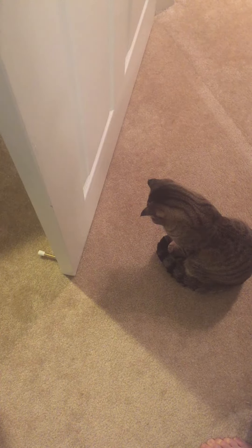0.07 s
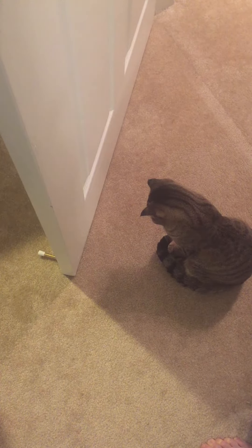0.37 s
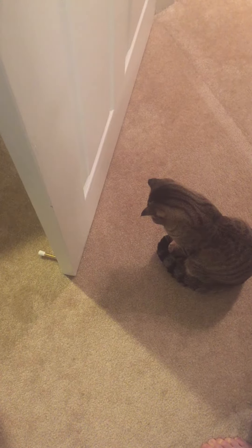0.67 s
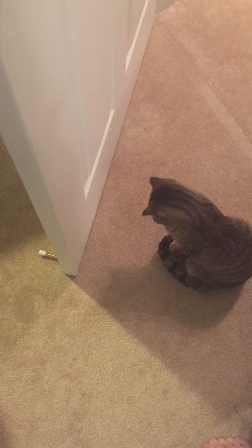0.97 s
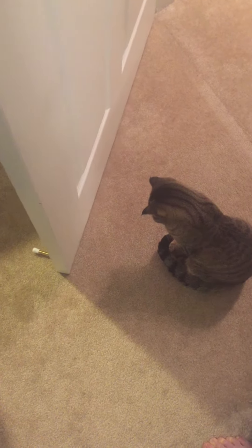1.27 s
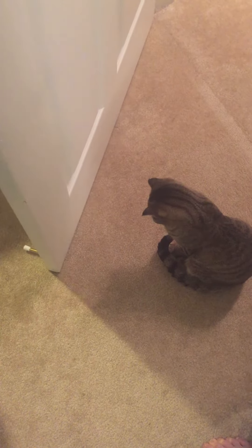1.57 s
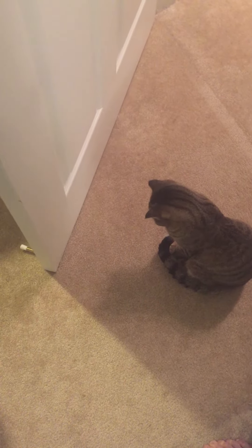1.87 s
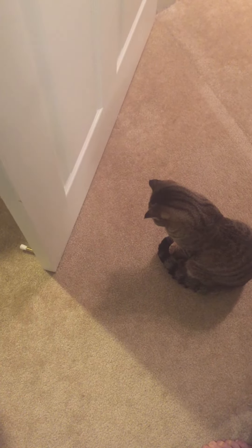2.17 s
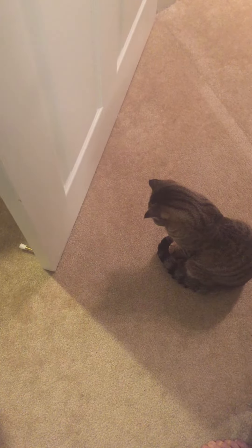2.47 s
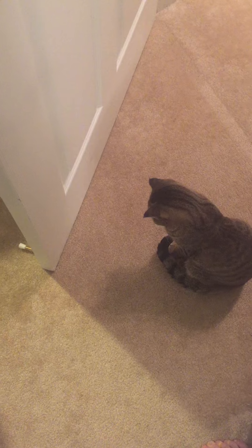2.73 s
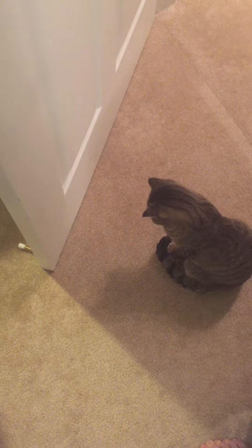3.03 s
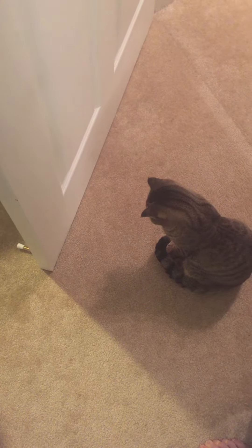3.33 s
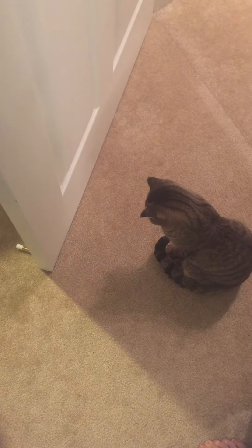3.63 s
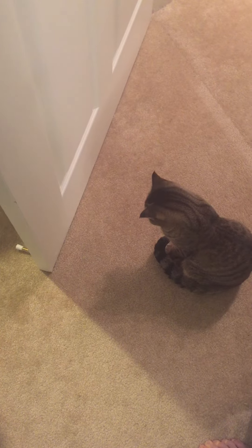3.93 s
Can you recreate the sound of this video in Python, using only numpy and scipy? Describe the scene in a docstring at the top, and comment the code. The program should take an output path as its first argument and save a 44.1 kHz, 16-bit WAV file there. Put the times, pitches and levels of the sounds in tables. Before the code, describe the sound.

A loose wooden door rattles twice and brushes the carpet in a quiet, humming room.

```python
"""A light panelled door, nudged in a small carpeted room, a couple of metres from one microphone.
It bumps twice with a short woody rattle and gives one faint last knock. At each bump the loose door
chatters, ringing its edge, its panels and the room; after the two main bumps the whole leaf thuds.
Its edge scrapes lightly and brushes the carpet as it swings. Behind it, ventilation rumbles and hums
throughout, with a few dull swells and a thin hiss of air and microphone."""
import sys
import numpy as np
from scipy import signal
from scipy.fft import rfft, irfft
from scipy.io import wavfile

SR = 44100
rng = np.random.default_rng(int(sys.argv[2]) if len(sys.argv) > 2 else 0)


def generate_wav(sig):
    """Save sig (samples, or channels by samples) to the path in sys.argv[1] as 16-bit PCM at SR."""
    pcm = np.round(np.clip(np.atleast_2d(sig).T, -1, 1) * 32767).astype(np.int16)
    wavfile.write(sys.argv[1], SR, pcm)


N = 176400
T = np.arange(N) / SR
FREQS = np.maximum(np.arange(N // 2 + 1) * SR / N, 1)

# bumps of the door: start_s, level_db, treble_tilt_db_per_octave, ring_gain_db
DOOR_BUMPS = [(1.123, -44.5, -1.25, -1), (1.2045, -53.5, -6.5, -5.5), (1.2289, -53.5, -10, -11),
              (1.263, -63, -9, -12), (1.3533, -48, -1.66, 0.5), (1.402, -53, -3.5, -5.5),
              (1.727, -59.5, -3, -3.5), (1.777, -67.5, -6, -11)]
# touches of the loose door within one bump: delay_s, gain_db
CHATTER_TOUCHES = [(0, -2.5), (.004, -8.5), (0.009, -8.5)]
# colour of the wood's clack: frequency_hz, gain_db
CLACK_SPECTRUM = [(250, 3), (450, -2.5), (700, -8.5), (1000, -11.5), (1400, -2.5), (1800, -3), (2300, -5),
                  (3100, -12), (4200, -16), (5300, -25.5), (7500, -34.5), (9300, -36), (11000, -50),
                  (15000, -55)]
# ringing modes of the panels, before the tail fades: pitch_hz, gain_db, t60_s
PANEL_MODES = [(876, -5.5, .5), (1145, -6, .55), (1328, -5.5, .35), (1457, -1, .33), (1505, -3, .38),
               (1652, 2.5, .35), (1730, 0, .3), (1753, 0, .3), (1883, 1, .3), (1950, 0, .3), (2085, -2, .3),
               (2212, 0, .28), (2256, -1, .28), (2353, -5, .33), (2455, -6, .28), (2589, -6, .3),
               (2715, -5, .26), (2826, -7, .3)]
# short, hard ring of the touching edge: pitch_hz, gain_db, t60_s
EDGE_CLICK_MODES = [(1780, -2, 0.052), (1930, -3.5, .07), (2196, -3.5, .07), (2780, -13, 0.1),
                    (4436, -19.5, .06), (6260, -22.5, 0.058), (8800, -23.5, 0.032)]
# the room's decay, before the tail fades: frequency_hz, t60_s
ROOM_DECAY = [(200, 0.46), (700, 0.54), (1050, 0.51), (1500, 0.41), (2500, 0.36), (4000, 0.33),
              (9000, 0.25)]
# thuds as the leaf takes up the two main bumps: centre_s, level_db
LEAF_THUDS = [(1.134, -47), (1.156, -46), (1.187, -44.5), (1.384, -47), (1.413, -43.5)]
# flexing of the whole leaf: pitch_hz, gain_db, t60_s
LEAF_MODES = [(67, -0.5, .2), (126, -1.5, 0.22), (170, 6.5, 0.065), (212, 1, 0.26), (251, -8, .15),
              (424, -14, 0.26)]
# light scrapes of the door's edge: centre_s, half_length_s, centre_hz, level_db
EDGE_SCRAPES = [(1.342, .014, 2120, -69), (1.63, 0.016, 2300, -73), (1.685, 0.038, 2960, -78.5)]
# the lower edge brushing the carpet through the swing: time_s, level_db
CARPET_LEVELS = [(.95, -95), (1.06, -87), (1.115, -66), (1.33, -71), (1.55, -69.5), (1.65, -77.5),
                 (1.82, -70.5), (1.95, -80), (2.2, -88)]
# colour of the brushing: frequency_hz, gain_db
CARPET_SPECTRUM = [(200, 10), (700, 3.5), (1600, 1.5), (3500, -6), (6000, -15.5), (15000, -23)]
# colour of the ventilation rumble: frequency_hz, gain_db
DUCT_SPECTRUM = [(20, -33.5), (35, -19.5), (48, -15.5), (58, 0.5), (70, -2), (96, -9.5), (118, 0),
                 (142, -3.5), (160, -6), (178, -0.5), (218, -4.5), (245, -5.5), (290, -15), (350, -11.5),
                 (450, -13.5), (500, -22), (620, -28), (850, -32), (1200, -38), (2500, -60)]
# hum of the fan: pitch_hz, level_db
FAN_TONES = [(59.3, -69.5), (120, -64), (140, -62), (214.5, -63.5), (345.5, -73.5), (414.5, -70)]
# dull swells in the rumble: centre_s, half_length_s, centre_hz, level_db
RUMBLE_SWELLS = [(0.135, 0.028, 556, -67.5), (0.486, 0.022, 64, -51.5), (1.026, 0.022, 70, -48.5),
                 (2.548, 0.0067, 93, -45), (2.894, 0.018, 600, -65), (2.952, 0.047, 149, -48.5),
                 (3.412, 0.03, 66.6, -55.5)]
# colour of the air and microphone hiss: frequency_hz, gain_db
HISS_SPECTRUM = [(300, 0), (1000, -2), (2000, -4), (3000, -7.5), (4300, -10), (5000, -13), (6000, -10.5),
                 (7600, -14.5), (9500, -13.5), (10400, -19), (11300, -16), (15000, -17)]

TILT_PIVOT_HZ = 1800


def door():
    """The door, a couple of metres off: every bump clacks, and the two main ones also thud."""
    out = sum(from_db(db) * leaf_thud(centre_s) for centre_s, db in LEAF_THUDS)
    for start_s, db, tilt_db, ring_db in DOOR_BUMPS:
        add(out, start_s, from_db(db) * clack(tilt_db, ring_db))
    return out


def clack(tilt_db, ring_db):
    """One bump: wood, panels and edge sound, and the clack's ring dies away ever faster."""
    fade_loss_db, fade_age_s = 3.5, 0.16  # the loss reached at this age; it keeps steepening
    tail_fade = from_db(-fade_loss_db * (T[:SR] / fade_age_s) ** 3)
    ringing = wood_crack(tilt_db, ring_db) + panel_ring(ring_db)
    return ringing * tail_fade + edge_click(tilt_db)


def wood_crack(tilt_db, ring_db):
    """Quick touches crack, then fill the room, where lows build later and the treble dies first."""
    direct_db, direct_t60_s, low_cut_hz = -3.5, 0.041, 1300
    room_db, build_cycles = 2, 9.3
    t = T[:SR]
    band_hz, bands = wood_bands(tilt_db)
    touch_power = sum(from_db(db - 60 * np.abs(t - delay_s) / direct_t60_s) ** 2 * (t >= delay_s)
                      for delay_s, db in CHATTER_TOUCHES)
    direct = from_db(direct_db) * np.sqrt(touch_power / (1 + (low_cut_hz / band_hz) ** 6))
    build_up = 1 - np.exp(-t * band_hz / build_cycles)
    tail = from_db(ring_db + room_db - 60 * t / at_hz(ROOM_DECAY, band_hz)) * build_up
    return (bands * np.hypot(direct, tail)).sum(0)


def wood_bands(tilt_db):
    """One second of the wood's countless close modes in third-octave bands: (centres_hz, bands)."""
    hz = np.maximum(np.arange(SR // 2 + 1), 1)
    colour = from_db(at_hz(CLACK_SPECTRUM, hz) + tilt_db * np.log2(hz / TILT_PIVOT_HZ))
    spectrum = np.exp(2j * np.pi * rng.random(len(hz))) * colour
    edges = np.geomspace(250, 16000, 19)
    bands = np.array([irfft(spectrum * (hz >= lo) * (hz < hi), SR) for lo, hi in zip(edges, edges[1:])])
    centres_hz = np.sqrt(edges[1:] * edges[:-1])
    return centres_hz[:, None], bands / bands.sum(0).std()


def panel_ring(ring_db, gain_db=-11, scatter_s=0.004):
    """Each panel mode is struck once, at a random instant early in the bump, and rings on."""
    out = 0
    for hz, db, t60_s in PANEL_MODES:
        touch = np.zeros(SR)
        touch[int(rng.random() * scatter_s * SR)] = rng.choice([-1, 1])
        out += from_db(ring_db + gain_db + db + rng.standard_normal()) * ring(touch, hz, t60_s)
    return out


def edge_click(tilt_db, spread_db=2):
    """Each touch of the chatter strikes the edge's short modes with a strength of its own."""
    out = 0
    for hz, db, t60_s in EDGE_CLICK_MODES:
        touches = np.zeros(SR)
        for delay_s, touch_db in CHATTER_TOUCHES:
            strength = from_db(touch_db + spread_db * rng.standard_normal(1))
            add(touches, delay_s, strength * rng.choice([-1, 1]))
        out += from_db(db + tilt_db * np.log2(hz / TILT_PIVOT_HZ)) * ring(touches, hz, t60_s)
    return out


def leaf_thud(centre_s, half_length_s=0.0037, low_cut_hz=65):
    """A soft push sets the low modes of the whole leaf swinging."""
    push = bell_curve(T - centre_s, half_length_s)
    out = 0
    for hz, db, t60_s in LEAF_MODES:
        mode = ring(push * rng.standard_normal(N), hz, t60_s)
        out += from_db(db) * mode / np.abs(mode).max()
    return signal.sosfilt(signal.butter(2, low_cut_hz, "high", fs=SR, output="sos"), out)


def edge_scrapes(roughness_db=1):
    """The edge drags grainily just before the second bump and the last knock."""
    drags = sum(noise_swell(*row, width_octaves=0.47) for row in EDGE_SCRAPES)
    return drags * from_db(roughness_db * drift(rate_hz=90))


def carpet_brush():
    """Carpet fibres brush under the door, rising and falling with the swing."""
    times_s, levels_db = np.transpose(CARPET_LEVELS)
    return from_db(np.interp(T, times_s, levels_db)) * noise(CARPET_SPECTRUM)


def duct_rumble(level_db=-51, waver_db=1.38):
    """The ventilation duct fills the room with a low, slightly wavering rumble."""
    return from_db(level_db + waver_db * drift(rate_hz=4)) * noise(DUCT_SPECTRUM)


def fan_hum(wander_hz=1.52, waver_db=5):
    """The fan hums in a few tones, each wandering in pitch and level."""
    out = 0
    for hz, db in FAN_TONES:
        cycles = rng.random() + np.cumsum(hz + wander_hz * drift(rate_hz=3.3)) / SR
        tone = np.sqrt(2) * np.sin(2 * np.pi * cycles)
        out += from_db(db + waver_db * drift(rate_hz=1.1)) * tone
    return out


def rumble_swells():
    """Soft, muffled swells come and go in the rumble."""
    return sum(noise_swell(*row, width_octaves=0.34) for row in RUMBLE_SWELLS)


def air_hiss(level_db=-73):
    """Air and microphone lay a thin, smooth hiss under everything."""
    return from_db(level_db) * noise(HISS_SPECTRUM)


def noise_swell(centre_s, half_length_s, centre_hz, level_db, width_octaves):
    """Noise around one pitch that rises and falls."""
    colour = bell_curve(np.log2(FREQS / centre_hz), width_octaves)
    band = irfft(np.exp(2j * np.pi * rng.random(len(FREQS))) * colour, N)
    envelope = bell_curve(T - centre_s, half_length_s)
    swell = envelope * band
    return from_db(level_db) * swell * np.sqrt(np.sum(envelope ** 2) / np.sum(swell ** 2))


def noise(spectrum):
    """Noise of a given colour, rms 1."""
    return unit_rms(irfft(rfft(rng.standard_normal(N)) * from_db(at_hz(spectrum, FREQS)), N))


def drift(rate_hz):
    """Random wandering, mostly slower than rate_hz, rms 1."""
    spectrum = rfft(rng.standard_normal(N)) / (1 + (FREQS / rate_hz) ** 2)
    return unit_rms(irfft(spectrum * (FREQS > 1), N))


def ring(force, hz, t60_s):
    """One damped mode: a unit click sets a sine of height 1 ringing."""
    decay = from_db(-60 / (t60_s * SR))
    angle = 2 * np.pi * hz / SR
    return signal.lfilter([0, np.sin(angle)], [1, -2 * decay * np.cos(angle), decay ** 2], force + 1e-18)


def bell_curve(offset, width):
    """A Gaussian of height 1."""
    return np.exp(-0.5 * (offset / width) ** 2)


def at_hz(table, hz):
    """Read a table on a log-frequency axis."""
    table_hz, values = np.transpose(table)
    return np.interp(np.log(hz), np.log(table_hz), values)


def add(out, start_s, sound):
    """Mix a sound in at start_s."""
    start = int(start_s * SR)
    out[start:start + len(sound)] += sound[:N - start]


def from_db(db):
    """Decibels to gain."""
    return 10 ** (np.asarray(db) / 20)


def unit_rms(x):
    """Scale to rms 1."""
    return x / np.sqrt(np.mean(x ** 2) + 1e-20)


def scene():
    """Door, carpet and room tone at one microphone."""
    swing = door() + edge_scrapes() + carpet_brush()
    room_tone = duct_rumble() + fan_hum() + rumble_swells() + air_hiss()
    return (swing + room_tone)[None]


def record(dry):
    """Both ends fade quickly and the top is cut steeply."""
    fade_s, cutoff_hz = 0.004, 15200
    fade = np.minimum(np.minimum(T, T[::-1]) / fade_s, 1)
    return signal.sosfilt(signal.ellip(12, 0.1, 70, cutoff_hz, fs=SR, output="sos"), dry * fade)


dry = scene()
out = record(dry)
generate_wav(out)
```